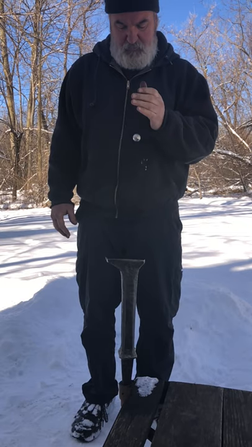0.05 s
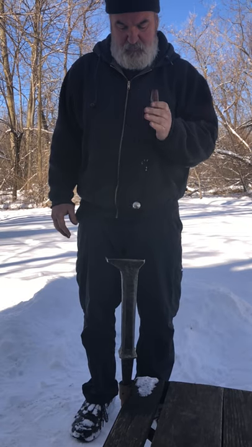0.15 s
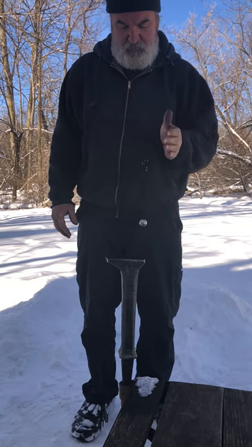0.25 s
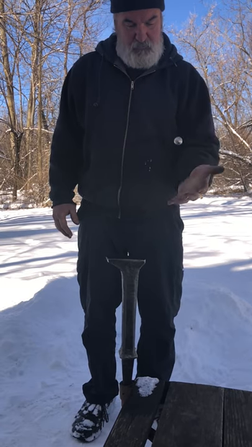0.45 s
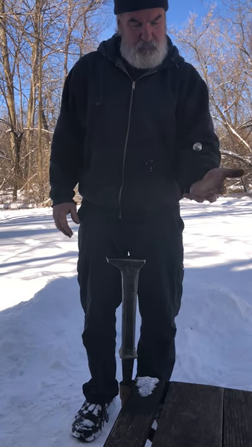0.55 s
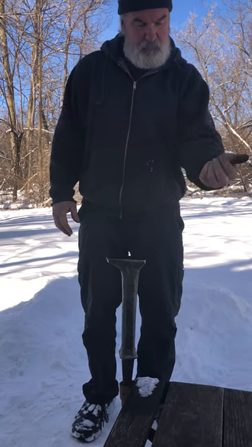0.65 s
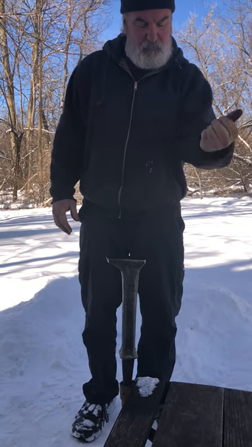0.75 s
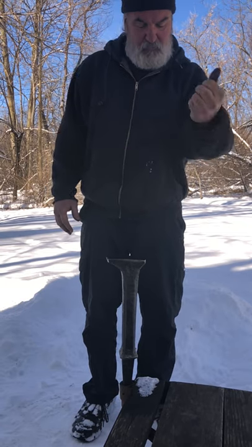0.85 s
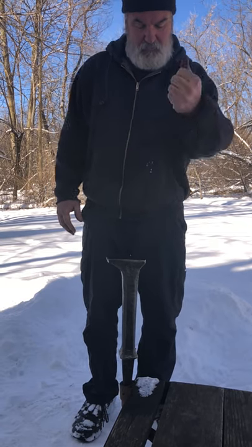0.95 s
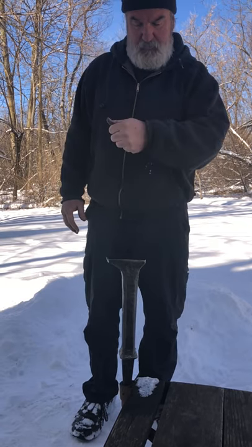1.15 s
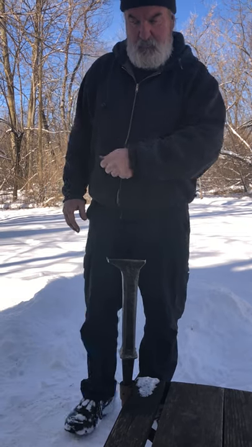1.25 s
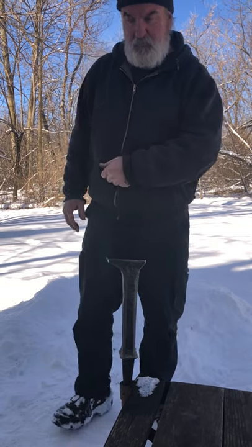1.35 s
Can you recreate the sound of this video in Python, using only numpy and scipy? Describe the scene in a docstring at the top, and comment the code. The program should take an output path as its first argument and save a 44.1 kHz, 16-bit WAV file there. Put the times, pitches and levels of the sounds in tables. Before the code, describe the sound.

One bright metallic clang rings out as a steel ball bounces off an anvil outdoors.

```python
"""A slender anvil rings high as a small steel ball drops on it, outdoors in the snow.
One bright crack sets off the iron's paired modes, which beat slowly; the wooden table thuds underneath.
Near reflections die fast and the trees return a faint tail. The ball lands softly in a hand and
a sleeve rustles, over a distant rumble. A limiter ducks the crack."""
import sys
import numpy as np
from scipy import signal
from scipy.io import wavfile
from scipy.ndimage import uniform_filter1d, minimum_filter1d

SR = 44100
rng = np.random.default_rng(int(sys.argv[2]) if len(sys.argv) > 2 else 0)


def waveform_to_disk(signal):
    """Save audio, clipped to [-1, 1], as 16-bit WAV at the path in sys.argv[1]."""
    frames = np.transpose(np.atleast_2d(signal))
    scaled = np.clip(frames, -1, 1) * 32767
    samples = np.round(scaled).astype(np.int16)
    wavfile.write(sys.argv[1], SR, samples)


N = 61739
T = np.arange(N) / SR

# distant outdoor rumble: (frequency [Hz], relative level [dB])
RUMBLE_COLOUR = [(20, -24), (35, -17), (60, -8), (105, -12.5), (135, 0.5), (155, -8), (180, -0.5),
                 (210, -14.5), (270, -6), (310, -16.5), (385, -6), (440, -14), (1000, -21), (1400, -29),
                 (3000, -35.5), (8000, -43), (15000, -46.5), (16500, -65)]
# swells of the rubbing sleeve: (time [s], level [dB])
RUB_ENVELOPE = [(0, -100), (.4, -80), (.54, -69.5), (.7, -80.5), (.95, -85), (1.14, -72), (1.28, -68),
                (1.4, -72)]
# hiss of rubbing cloth: (frequency [Hz], relative level [dB])
SLEEVE_RUB_COLOUR = [(200, 1.5), (1000, 1.5), (2000, -7.5), (4500, -7), (9000, -13.5), (15000, -11.5)]
# flaps of the sleeve: (time [s], level [dB])
SLEEVE_FLAPS = [(1.063, -56), (1.124, -53), (1.138, -54.5)]
# dull puff of one flap: (frequency [Hz], relative level [dB])
SLEEVE_FLAP_COLOUR = [(60, -21), (250, 8.5), (700, -10), (1500, -12), (2500, -20), (5000, -23.5),
                      (15000, -45)]
# ball landing in the hand: (time [s], level [dB])
CATCH_TICKS = [(.615, -59), (.620, -56)]
# tone of one soft tick: (frequency [Hz], relative level [dB])
TICK_COLOUR = [(500, -5), (3000, -17.5), (5500, -4), (9000, -7), (15000, -10)]
# return from the trees: (frequency [Hz], relative level [dB])
TREE_COLOUR = [(200, -4), (500, -1.5), (1000, 4.5), (1700, -2), (2600, 4), (3600, -10.5), (5000, 4.5),
               (7500, -18), (16000, -35)]
# scatter off the table and nearby surfaces: (frequency [Hz], relative level [dB])
SCATTER_COLOUR = [(60, -32.5), (250, -10), (550, -12.5), (1000, -1), (1600, -3), (2000, -6), (2550, 1.5),
                  (3600, -12), (4900, -3.5), (6000, -15), (8000, -18.5), (12000, -22), (16000, -30)]
# decay of that scatter: (frequency [Hz], t60 [s])
SCATTER_DECAY = [(100, 0.6), (500, .14), (2500, 0.11), (6000, 0.1), (15000, 0.023)]
# resonances of the table's boards: (frequency [Hz], relative level [dB], t60 [s])
BOARD_MODES = [(88.9, -16.5, .22), (119.87, -8.5, 0.36), (136.3, -20, .5), (167.8, -10, 0.15),
               (223.6, 0, 0.14), (257.9, -1.5, 0.075), (314.7, 0, .08), (452.4, -12.5, 0.13)]
# anvil's foot pushing on the table: (time [s], gain [dB], contact length [s])
FOOT_THUDS = [(0.209, -30.5, .0015), (0.253, -25, 0.00705)]
# crack of steel on iron: (frequency [Hz], relative level [dB])
CRACK_COLOUR = [(60, -45.5), (250, -33), (500, -29), (1000, -5), (1900, -22.5), (2900, 0), (4000, 0.5),
                (6500, 10.5), (10000, 1), (16000, -2.5)]
# heavily damped clack of the contact: (delay [s], frequency [Hz], peak level [dB], time to peak [s])
CLACK_MODES = [(.0003, 1020, -26, 0.0034), (.0002, 2900, -11.5, .0008), (.001, 4800, -3, 0.00091)]
# anvil modes, each with a close twin: (frequency [Hz], level [dB], t60 [s],
# twin offset [Hz], twin level [dB], twin t60 [s], shimmer depth [dB rms])
ANVIL_MODES = [(860, -37, .1, 12, -54, .1, 2), (1075, -27, .115, 14, -46, .09, 2),
               (1453, -42, .13, 9, -54, .12, 2), (2345, -35, .2, 9, -52, .2, 2),
               (2657, -28, .15, 14, -46, .17, 2), (3682, -29, .11, 6, -50, .1, 2),
               (4945, -28, .13, 13, -48, .25, 2), (5280, -34, .33, 6.7, -62, .6, 2),
               (6757, -28, .2, 4.5, -23.5, .4, .6), (7159, -31, .34, 2.8, -52, .7, 1.2),
               (9017, -33, .15, 1.6, -43, .54, 1.5), (9765, -26.5, .82, 1.5, -28.7, 1.13, .5),
               (10922, -38, .24, 9, -50, .24, 2), (10978, -34, .76, 1.8, -37, .8, 2),
               (11754, -35, .65, 2.4, -53, 1.05, 1.7), (12512, -31, .28, 20, -43, .24, 2),
               (13624, -31.5, .5, 1.1, -52, 1.0, 1.5), (14290, -57, .55, 5, -70, .55, 1.5),
               (14811, -19.7, .41, 3, -48, .4, .5)]

HIT_S = .1998


def amp(db):
    """Decibels to gain."""
    return 10 ** (np.asarray(db) / 20)


def fade(t, t60):
    """Exponential decay, 60 dB in t60 seconds."""
    return np.exp(-np.log(1000) * t / t60)


def curve_at(points, hz):
    """Reads a curve on a log-frequency axis."""
    frequencies, values = np.transpose(points)
    return np.interp(np.log(hz + 1), np.log(frequencies), values)


def add(mix, start_s, sound):
    """Mixes a sound in at its cue."""
    part = mix[round(start_s * SR):][:len(sound)]
    part += sound[:len(part)]


def coloured(sound, colour):
    """Minimum-phase EQ with the given curve; white noise keeps its level."""
    gain = amp(curve_at(colour, abs(np.fft.fftfreq(4096, 1 / SR))))
    response = np.exp(np.conj(signal.hilbert(np.log(gain))))
    taps = np.fft.ifft(response).real[:2048]
    return signal.fftconvolve(sound, taps / np.linalg.norm(taps))[:N]


def noise(colour, t60=np.inf):
    """Coloured noise that starts at once and dies away, or sustains if no decay is given."""
    return coloured(rng.standard_normal(N) * fade(T, t60), colour)


def puffs(cues, colour, t60):
    """Short soft contacts without any ring."""
    out = np.zeros(N)
    for start_s, db in cues:
        add(out, start_s, amp(db) * noise(colour, t60))
    return out


def mode(hz, db, t60):
    """One dying tone."""
    return amp(db) * fade(T, t60) * np.cos(2 * np.pi * hz * T)


def shimmer(depth_db, fastest_hz=37):
    """Random gain that makes a tone waver."""
    rates = np.geomspace(fastest_hz / 6, fastest_hz, num=12)[:, None]
    t = T[::64]
    drift = np.sin(2 * np.pi * (rates * t + rng.random(rates.shape))).sum(0)
    return np.interp(T, t, amp(depth_db * drift / drift.std()))


def distant_rumble():
    """A steady, low bed of outdoor air."""
    return amp(-61.5) * noise(RUMBLE_COLOUR)


def sleeve():
    """Cloth rubs and flaps as the arm moves."""
    rub = amp(np.interp(T, *np.transpose(RUB_ENVELOPE))) * noise(SLEEVE_RUB_COLOUR)
    return rub + puffs(SLEEVE_FLAPS, SLEEVE_FLAP_COLOUR, t60=.043)


def catch():
    """The ball lands in the hand with two soft ticks."""
    return puffs(CATCH_TICKS, TICK_COLOUR, t60=.016)


def reflections():
    """Dense near scatter dies fast, treble first; the trees return a faint longer tail."""
    hz, t, bands = signal.stft(rng.standard_normal(N), SR, nperseg=256)
    decay = fade(t, curve_at(SCATTER_DECAY, hz)[:, None])
    scatter = signal.istft(bands * decay, SR)[1][:N]
    trees = amp(-57) * noise(TREE_COLOUR, t60=.98)
    return amp(-23) * coloured(scatter, SCATTER_COLOUR) + trees


def table_thuds(low_cut_hz=98):
    """The anvil pushes on the boards, then settles with a duller thud; boards radiate little deep bass."""
    boards = sum((-1) ** k * mode(*row) for k, row in enumerate(BOARD_MODES))
    out = np.zeros(N)
    for start_s, db, contact_s in FOOT_THUDS:
        push = np.sin(np.pi * np.minimum(T / contact_s, 1)) ** 2
        add(out, start_s, amp(db) * signal.fftconvolve(boards, push / push.sum())[:N])
    return signal.sosfilt(signal.butter(2, low_cut_hz, "high", fs=SR, output="sos"), out)


def ball_crack():
    """Steel meets iron: a bright crack and a few resonances that swell and die within milliseconds."""
    out = amp(-6.5) * noise(CRACK_COLOUR, t60=.018)
    for delay_s, hz, db, peak_s in CLACK_MODES:
        envelope = T / peak_s * np.exp(1 - T / peak_s)
        add(out, delay_s, amp(db) * envelope * np.sin(2 * np.pi * hz * T))
    return out


def anvil_ring():
    """The iron rings in close pairs that drift out of step and back; the tones waver and echo faintly."""
    ring = np.zeros(N)
    for k, (hz, db, t60, offset_hz, twin_db, twin_t60, shimmer_db) in enumerate(ANVIL_MODES):
        pair = mode(hz, db, t60) + mode(hz + offset_hz, twin_db, twin_t60)
        ring += (-1) ** k * shimmer(shimmer_db) * pair
    echoes = rng.standard_normal(N) * fade(T, t60=.25)
    tail = signal.fftconvolve(ring, echoes / np.linalg.norm(echoes))[:N]
    return ring + amp(-24) * tail


def scene():
    """The blow and the small movements over the outdoor rumble, in mono."""
    out = distant_rumble() + table_thuds() + sleeve() + catch()
    add(out, HIT_S, ball_crack() + anvil_ring() + reflections())
    return out[None]


def limiter(sound, threshold_db=-16, slope=.84, attack_s=.0013, hold_s=.0075, release_db_per_s=1150):
    """Ducks just after the crack's onset, holds, then recovers."""
    power_db = 10 * np.log10(abs(uniform_filter1d(sound[0] ** 2, size=44)) + 1e-12)
    cut_db = slope * np.maximum(power_db - threshold_db, 0)
    hold = 2 * round(hold_s * SR / 2) + 1
    held_db = -minimum_filter1d(-cut_db, hold, origin=hold // 2)
    release_db = release_db_per_s * T
    duck_db = np.maximum.accumulate(held_db + release_db) - release_db
    pole = np.exp(-1 / (attack_s * SR))
    return sound / amp(signal.lfilter([1 - pole], [1, -pole], duck_db))


def record(dry, ceiling_db=-3.5, low_cut_hz=40, high_cut_hz=16600):
    """What slips past the limiter saturates; then the sub-bass and the very top are trimmed."""
    ducked = limiter(dry)
    saturated = ducked / (1 + (ducked / amp(ceiling_db)) ** 8) ** (1 / 8)
    thinned = signal.sosfilt(signal.butter(2, low_cut_hz, "high", fs=SR, output="sos"), saturated)
    lowpass = signal.firwin(201, high_cut_hz, window=("kaiser", 9), fs=SR)
    return signal.oaconvolve(thinned, lowpass[None], "same")


dry = scene()
out = record(dry)
waveform_to_disk(out)
```